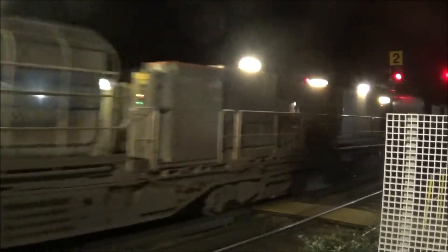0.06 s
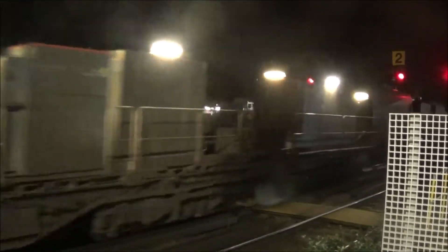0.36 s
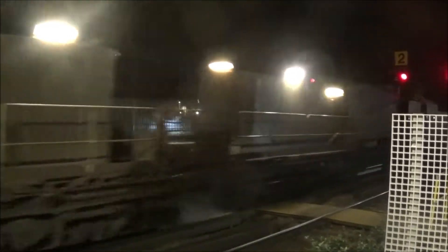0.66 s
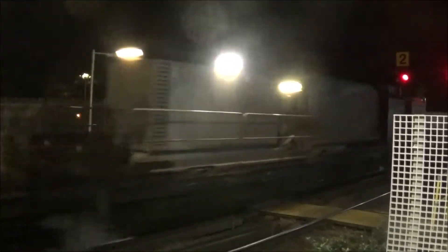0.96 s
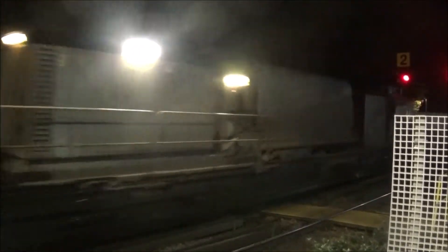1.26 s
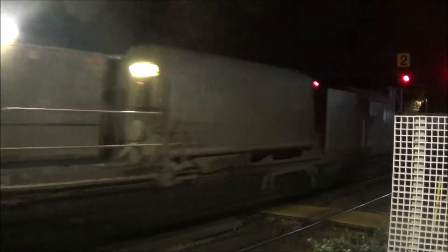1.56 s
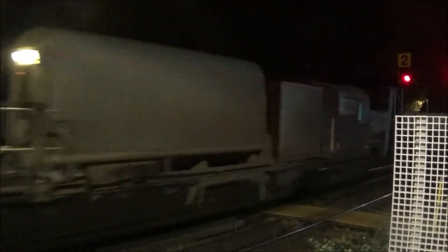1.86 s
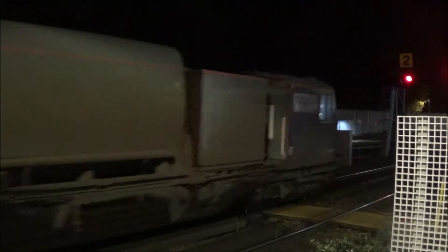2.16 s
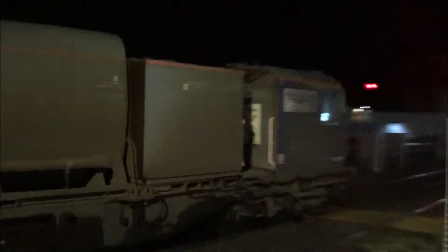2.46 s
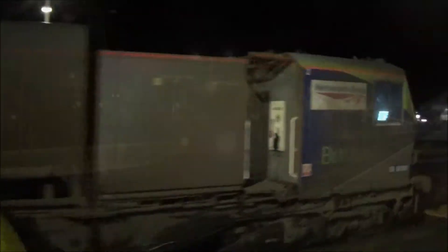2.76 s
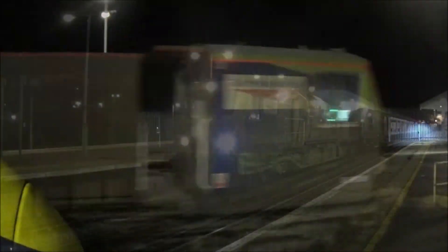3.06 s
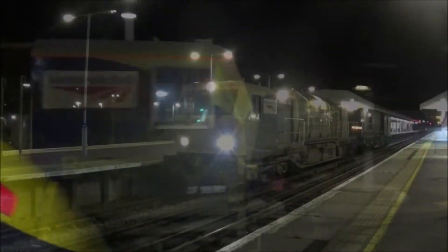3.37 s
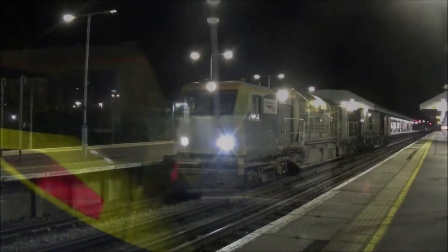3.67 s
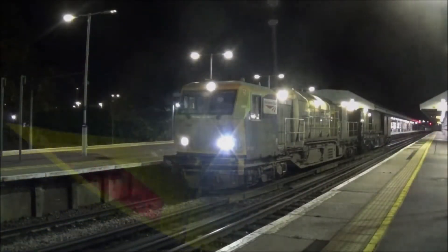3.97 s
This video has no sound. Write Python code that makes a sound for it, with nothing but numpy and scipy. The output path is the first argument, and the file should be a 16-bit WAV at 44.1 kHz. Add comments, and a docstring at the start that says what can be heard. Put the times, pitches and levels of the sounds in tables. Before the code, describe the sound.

A train rolls past, its water jets hissing and splashing on the rails from right to left. The spray recedes into wheel roar, then the sound cuts to a station, where a standing train's diesel engines clatter over roaring fans.

```python
"""High-pressure water jets hiss and splash on the rails as a rail treatment train rolls past at night.
The spray crosses from right to left and recedes, leaving wheel roar and a generator hum. The scene
then cuts to a station, where a second train stands with two diesel engines clattering at different
rates over the roar of fans and exhaust, with a few clanks, a fading hiss and a last rush of air."""
import sys
import numpy as np
from scipy import signal
from scipy.fft import rfft, irfft
from scipy.io import wavfile
from scipy.ndimage import uniform_filter1d, minimum_filter1d, map_coordinates

SR = 44100
rng = np.random.default_rng(int(sys.argv[2]) if len(sys.argv) > 2 else 0)


def master_out(mix):
    """Clip the mix to full scale and print it as 16-bit PCM to the path in sys.argv[1]."""
    frames = np.transpose(np.atleast_2d(mix))
    ceiling = np.clip(frames, -1, 1)
    pcm = np.round(ceiling * 32767).astype(np.int16)
    wavfile.write(sys.argv[1], SR, pcm)


N = 176400
T = np.arange(N) / SR
FREQS = np.maximum(np.arange(N // 2 + 1) * SR / N, 1)
CUT_S = 2.731  # from the lineside to the station
FAR_SIDE_DB = 5.5  # extra stereo width for the wheels and the receding spray
RECEDING_SIDE_DB = FAR_SIDE_DB * np.clip(T - 1.5, 0, 1)

# Tone of the nozzle hiss (frequency [Hz], level [dB])
JET_TONE = [(3000, -33.5), (4900, -15), (5600, 0), (7500, 1.5), (9100, 2.5), (10200, -3.5), (12000, -15),
            (15500, -55)]
# Its fader (time [s], level [dB])
JET_FADER = [(0, -23), (.1, -17), (.5, -17), (.78, -15), (1.1, -16.5), (1.32, -18), (1.5, -26.5),
             (1.8, -28.5), (2.25, -34), (2.5, -42.5), (2.7, -34.5)]
# Its tilt EQ (time [s], highs over lows [dB])
JET_TILT = [(.5, -6.5), (.8, 1.5), (1.3, 3.5)]

def jets(split_hz=7300):
    """Water hisses out of the nozzles, brightening as they pass."""
    hiss = noise(colour(JET_TONE), RECEDING_SIDE_DB)
    highs = above(hiss, split_hz)
    tilt = undb(curve(JET_TILT) / 2)
    return (highs * tilt + (hiss - highs) / tilt) * undb(curve(JET_FADER))


# Tone of the splash (frequency [Hz], level [dB])
SPLASH_TONE = [(120, -51), (350, -18.5), (850, -10.5), (1200, -6), (1750, -1), (4400, 1), (6500, -2),
               (9300, -0.5), (11000, -9), (15500, -21.5)]
# Its fader (time [s], level [dB])
SPLASH_FADER = [(0, -14.5), (.55, -14.5), (.82, -16), (1.15, -15), (1.48, -16), (1.72, -18), (1.92, -24),
                (2.1, -27.5), (2.5, -31.5), (2.73, -30)]
# Its low shelf (time [s], gain [dB])
SPLASH_SHELF = [(.4, 3), (1.1, -1.5), (1.7, -0.5), (2.2, 1)]

def splash(split_hz=1220):
    """Water blasts rail and ballast; the low end is thinnest as the nozzles pass."""
    wash = noise(colour(SPLASH_TONE), RECEDING_SIDE_DB) * undb(curve(SPLASH_FADER))
    highs = above(wash, split_hz)
    return highs + (wash - highs) * undb(curve(SPLASH_SHELF))


# Swells of spray (time [s], half length [s], centre [Hz], width [Hz], level [dB])
SPRAY_SWELLS = [(.42, 0.14, 1520, 1110, -23), (0.818, 0.25, 11400, 2505, -26.5),
                (1.462, 0.1, 4120, 1700, -26.5), (1.68, .22, 12500, 3500, -37)]

def swells():
    """Bands of spray rise and fall briefly as the nozzles go by."""
    return sum(noise(resonance(hz, width)) * undb(db) * np.exp(-((T - at) / length) ** 2)
               for at, length, hz, width, db in SPRAY_SWELLS)


# Delay of the spray's reflection (time [s], lag [ms])
ECHO_LAG = [(0, 2.15), (1.1, 1.8), (1.5, 1.42), (1.85, 1.38), (2.3, 1.75)]

def wagon_echo(x, level_db=-15, top_hz=3600):
    """Adds a short, dull echo off the wagons; its moving lag sweeps a comb through the mids."""
    late = np.arange(N) - curve(ECHO_LAG) * SR / 1000
    dull = x - above(x, top_hz)
    return x + undb(level_db) * np.array([map_coordinates(side, [late], mode="mirror") for side in dull])


def shimmer(x, depth_db=.8, band_hz=190, rate_hz=4):
    """The tone wanders: each narrow band swells and fades by itself."""
    size = 1024
    bands = signal.stft(x, nperseg=size)[2]
    drift = rng.standard_normal(bands.shape[1:])
    for axis, span in enumerate([band_hz * size / SR, 2 * SR / size / rate_hz]):
        for _ in range(2):
            drift = uniform_filter1d(drift, round(span), axis=axis, mode="wrap")
    return signal.istft(bands * undb(depth_db * drift / drift.std()), nperseg=size)[1][:, :N]


# Pan of the pass-by (time [s], left over right [dB])
PASS_PAN = [(0, -3), (1.2, 2), (1.6, 3.5), (2.7, 1.2)]

def spray():
    """All the water together crosses from right to left and recedes."""
    return shimmer(wagon_echo(splash() + jets() + swells())) * pan(curve(PASS_PAN))


# Tone of the wheel roar (frequency [Hz], level [dB])
WHEEL_TONE = [(25, -36), (55, -26), (115, -17.5), (190, -8.5), (262, 0), (400, -2), (600, -1.5), (900, -5),
              (1500, -8), (3000, -24.5)]
# Its fader (time [s], level [dB])
WHEEL_FADER = [(0, -33.5), (.45, -40), (.9, -42), (1.48, -42), (1.65, -35.5), (2.73, -34)]

def wheels():
    """Rolling wheels lay a low roar under the spray."""
    return noise(colour(WHEEL_TONE), FAR_SIDE_DB) * undb(curve(WHEEL_FADER))


# Ring of the rail (time [s], centre [Hz], level [dB])
RAIL_RING = [(0, 613, -48), (.85, 649, -41), (1.55, 723, -37), (1.95, 663, -42.5), (2.7, 631, -49)]

def rail(width_hz=190):
    """The rail rings as a randomly driven resonance with a gliding centre."""
    phase = 2 * np.pi * np.cumsum(curve(RAIL_RING)) / SR
    ring = (walk(width_hz / 2) * np.cos(phase) + walk(width_hz / 2) * np.sin(phase)) / np.sqrt(2)
    return ring * undb(curve(RAIL_RING, column=2))


# Groan of the bogie (time [s], pitch [Hz], level [dB])
BOGIE_GROAN = [(0, 272.6, -46), (.18, 320, -48), (.32, 342, -41), (.55, 338, -42), (.72, 322, -53),
               (.88, 298, -43), (1.15, 285, -57)]

def bogie(wobble_hz=5.5, rate_hz=22, octave_db=-2, rough_db=2):
    """The passing bogie groans roughly; its octave comes out when it is loudest."""
    phase = 2 * np.pi * np.cumsum(curve(BOGIE_GROAN) + wobble_hz * walk(rate_hz)) / SR
    force = undb(curve(BOGIE_GROAN, column=2))
    groan = np.sin(phase) + undb(octave_db) * force / force.max() * np.sin(2 * phase)
    return np.sqrt(2) * groan * force * undb(rough_db * walk(rate_hz))


# Fader of the hum (time [s], level [dB])
HUM_FADER = [(0, -61.5), (.8, -75), (1.45, -74), (1.72, -60.5), (2.73, -66)]

def generator(hz=76.3, octave_db=3):
    """The generator hums low with a strong octave, its level wavering."""
    phase = 2 * np.pi * hz * T
    hum = np.sin(phase) + undb(octave_db) * np.sin(2 * phase)
    return np.sqrt(2) * hum * undb(curve(HUM_FADER) + walk(8))


# Rhythm of each diesel (rate [knocks/s], time of one knock [s], decay [s])
SLOW_RHYTHM = (23.89, 3.367, .022)
FAST_RHYTHM = (31.05, 3.3435, .014)
# Place of each in the mix (level [dB], left over right [dB])
SLOW_MIX = (-25, -2.5)
FAST_MIX = (-27.5, -1.3)
# Tone of their knocks (frequency [Hz], level [dB])
SLOW_TONE = [(500, -18), (1200, -5), (2050, -3), (2580, -3), (3400, 1), (5150, -6), (5750, -2),
             (6800, -13.5), (9500, -15.5), (14000, -43)]
FAST_TONE = [(300, -15), (750, -0.5), (3900, -1), (4900, -18), (5800, 2.5), (7000, -2.5), (14000, -48)]

def diesel(rhythm, mix, tone, jitter_s=.002, scatter_db=1.1):
    """Each firing sets off a burst of clatter, a little different in strength and timing."""
    (rate, at, decay), (db, pan_db) = rhythm, mix
    firings = (T - at + jitter_s * walk(rate / 2)) * rate
    count = np.floor(firings).astype(int)
    sizes = undb(scatter_db * rng.standard_normal(size=256))
    age = (firings - count) / rate
    # each knock overlaps the tail of the one before
    gate = sum(sizes[(count - k) % len(sizes)] * blow(age + k / rate, decay) for k in range(2))
    return housed(tone) * gate / np.sqrt(np.mean(gate ** 2)) * undb(db) * pan(pan_db)


# Clank hits (time [s], level [dB])
CLANK_HITS = [(2.957, -13), (3.085, -17), (3.118, -14.5), (3.313, -17), (3.374, -15), (3.474, -16),
              (3.666, -23), (3.792, -16)]
# Their tone (frequency [Hz], level [dB])
CLANK_TONE = [(400, -19), (1300, -1), (3500, 4), (6000, -5.5), (14000, -37)]

def clanks(decay_s=.012):
    """Harder hits stand out of the clatter and ring the housings."""
    return housed(CLANK_TONE) * sum(undb(db) * blow(T - at, decay_s) for at, db in CLANK_HITS)


# Tone of fans and exhaust (frequency [Hz], level [dB])
FAN_TONE = [(25, -13), (120, -11), (270, 1.5), (540, 2.5), (880, -4), (1500, 0.5), (2600, -4), (3900, -0.5),
            (5100, -7.5), (9500, -13.5), (15500, -43)]
# Their fader (time [s], level [dB])
FAN_FADER = [(2.73, -20.5), (4, -21.3)]

def fans():
    """Fans and exhaust make a steady bed of roar."""
    return housed(FAN_TONE) * undb(curve(FAN_FADER))


# Resonances of the engine housings (centre [Hz], width [Hz], peak against the dry sound [dB])
HOUSING_MODES = [(94, 12, -1), (148.4, 15, 0.5), (433, 39, -2.5), (773, 114, 0.5), (1027, 105, 1.5),
                 (1307, 120, -2), (1600, 55, -7), (2020, 290, -4.5), (2920, 130, -11), (4130, 86, -20),
                 (4770, 63, -1), (5600, 230, -4.5)]

def housed(tone):
    """Engine noise of the given tone, ringing the housings."""
    body = 1 + sum(undb(db) * resonance(hz, width) for hz, width, db in HOUSING_MODES)
    return noise(colour(tone) * body)


# Band of rushing air (centre [Hz], width [Hz], level [dB])
AIR_BAND = (910, 1140, -18)

def air_rush(start_s=3.942, attack_s=.018):
    """Air rushes in sharply at the very end."""
    hz, width, db = AIR_BAND
    return noise(resonance(hz, width)) * undb(db) * np.clip((T - start_s) / attack_s, 0, 1)


# Band of hiss (centre [Hz], width [Hz], level at the cut [dB], fall [dB/s])
HISS_BAND = (8600, 3500, -30.5, 9.5)

def station_hiss():
    """A thin hiss fades away behind the engines."""
    hz, width, db, fall = HISS_BAND
    return noise(resonance(hz, width)) * undb(db - fall * np.maximum(T - CUT_S, 0))


def undb(db):
    """Decibels to gain."""
    return 10 ** (np.asarray(db) / 20)


def curve(rows, column=1):
    """One column of a table, joined by straight lines in time."""
    rows = np.array(rows, float)
    return np.interp(T, rows[:, 0], rows[:, column])


def colour(points):
    """EQ curve through (frequency [Hz], level [dB]) points."""
    hz, db = np.array(points, float).T
    return undb(np.interp(np.log(FREQS), np.log(hz), db))


def resonance(hz, width):
    """EQ curve of a steep resonance."""
    return 1 / (1 + ((FREQS - hz ** 2 / FREQS) / width) ** 2)


def above(x, hz):
    """Steep high-pass."""
    return irfft(rfft(x) / (1 + (hz / FREQS) ** 12), N)


def noise(eq, widen_db=0, diffuse_db=-13.5):
    """Stereo noise through an EQ curve: a direct mid at rms 1 and a weaker, diffuse side."""
    mid, side = (irfft(rfft(rng.standard_normal(N)) * eq, N) for _ in range(2))
    return (mid + undb(diffuse_db + widen_db) * np.array([side, -side])) / mid.std()


def pan(db):
    """Left and right gains for a level difference."""
    return undb(np.array([db, -db]) / 2).reshape(2, -1)


def walk(hz):
    """Smooth random modulation up to the given rate, spread 1."""
    x = irfft(rfft(rng.standard_normal(N)) / (1 + (FREQS / hz) ** 4), N)
    return x / x.std()


def blow(age, decay, attack_s=.002):
    """Envelope of a hit: quick rise, exponential fall."""
    age = np.maximum(age, 0)
    return (1 - np.exp(-age / attack_s)) * np.exp(-age / decay)


def scene():
    """The passing train, then a hard cut to the standing one."""
    passing = spray() + wheels() + rail() + bogie() + generator()
    engines = diesel(SLOW_RHYTHM, SLOW_MIX, SLOW_TONE) + diesel(FAST_RHYTHM, FAST_MIX, FAST_TONE)
    standing = engines + (fans() + clanks() + air_rush()) * pan(db=-2.0) + station_hiss()
    return np.where(T < CUT_S, passing, standing)


# Stereo width of the microphone (frequency [Hz], side gain [dB])
MIC_WIDTH = [(200, -21), (380, -14), (700, -1.5), (2400, 1), (9500, 0.5), (13000, -17.5)]

def record(dry, limiter_s=.004, top_hz=15700):
    """The microphone narrows bass and top, a limiter ducks peaks over full scale, the top is cut off."""
    mid = (dry[0] + dry[1]) / 2
    side = irfft(rfft(dry[0] - dry[1]) / 2 * colour(MIC_WIDTH), N)
    heard = np.array([mid + side, mid - side])
    size = int(limiter_s * SR)
    duck = 1 / np.maximum(np.abs(heard).max(axis=0), 1)
    gain = uniform_filter1d(minimum_filter1d(duck, size), size)
    return irfft(rfft(heard * gain) * (FREQS < top_hz), N)


dry = scene()
out = record(dry)
master_out(out)
```